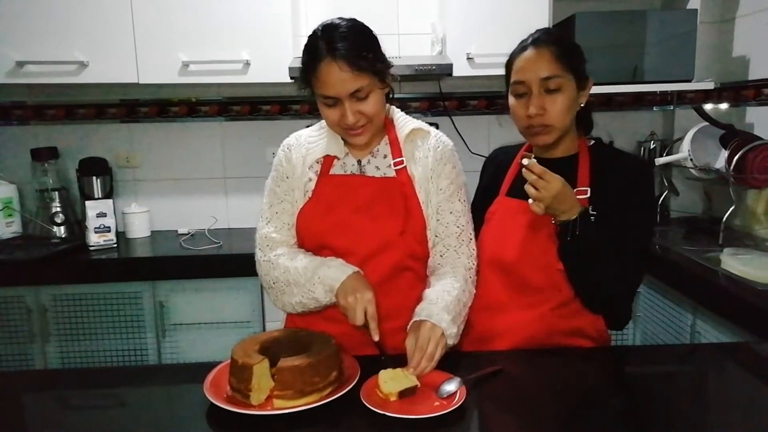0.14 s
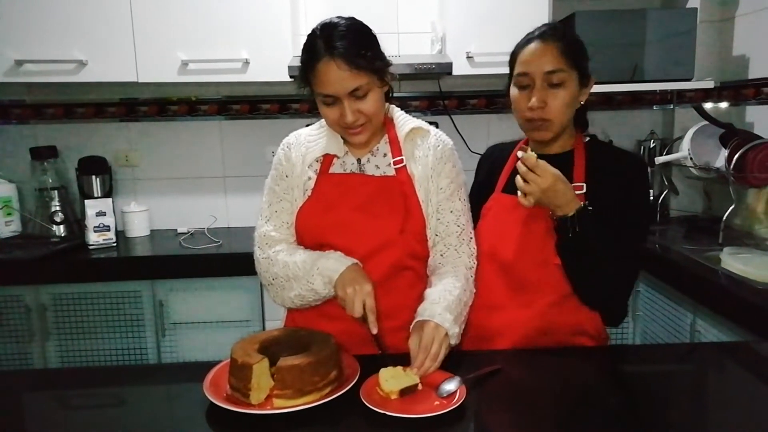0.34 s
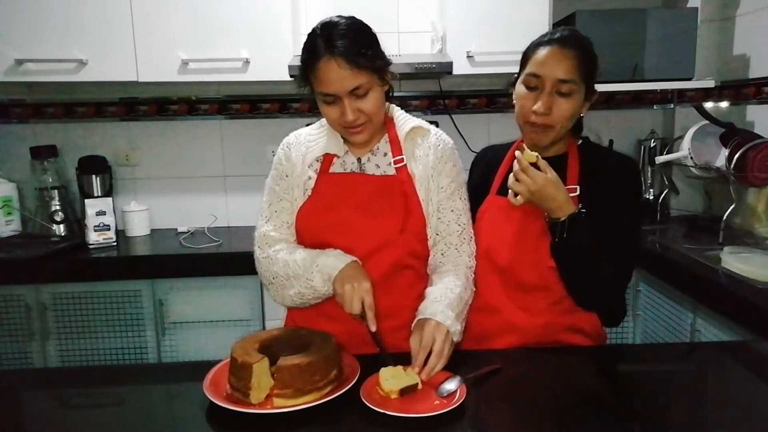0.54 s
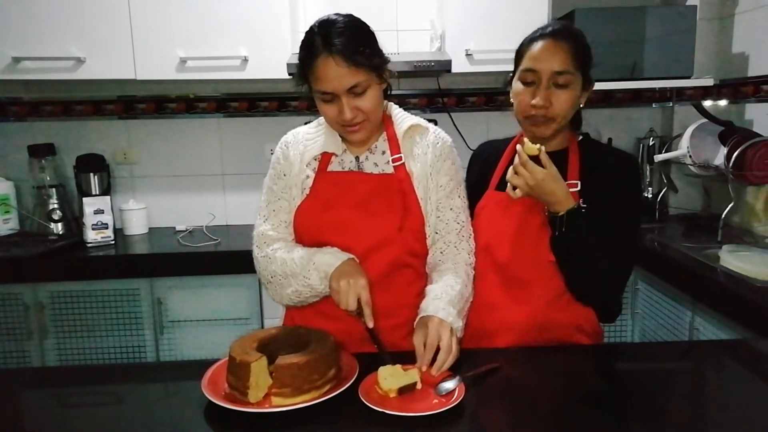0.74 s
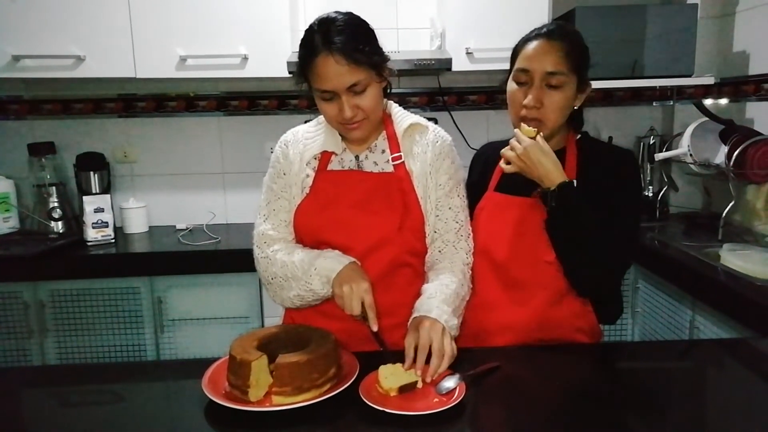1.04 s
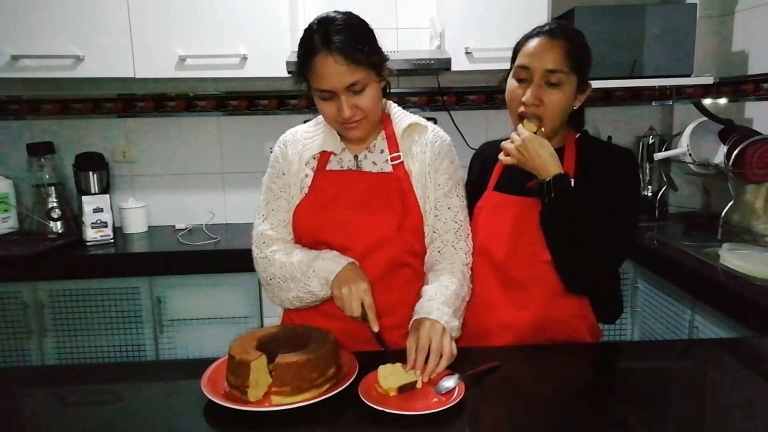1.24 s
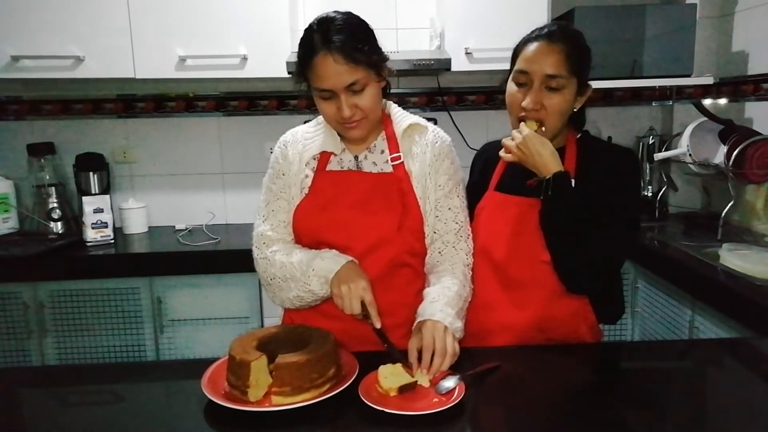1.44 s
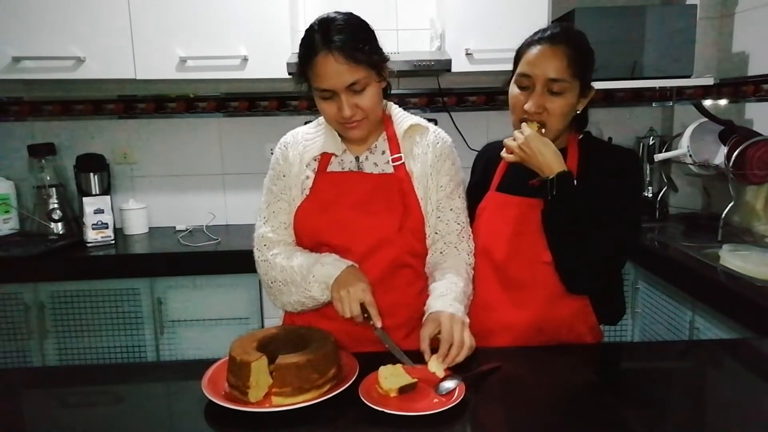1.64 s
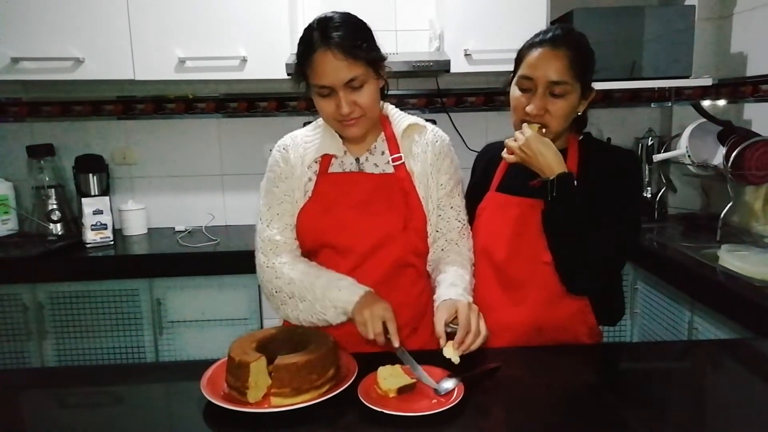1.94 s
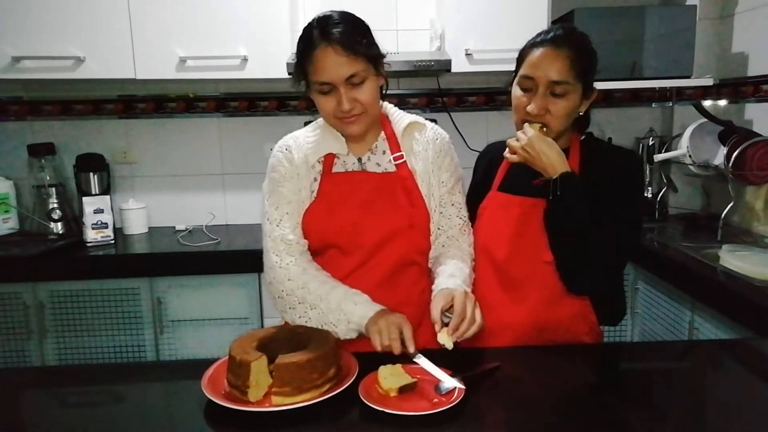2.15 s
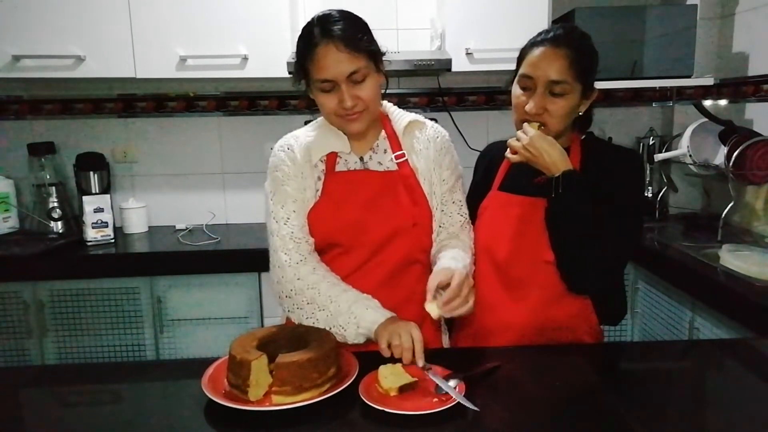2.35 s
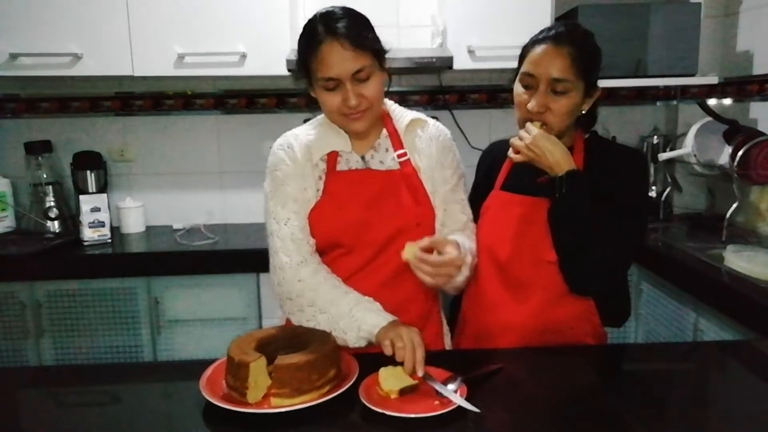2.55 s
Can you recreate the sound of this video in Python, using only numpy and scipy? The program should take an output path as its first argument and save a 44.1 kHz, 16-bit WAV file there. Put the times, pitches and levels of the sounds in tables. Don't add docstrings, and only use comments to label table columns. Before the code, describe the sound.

Knife clinks against a ceramic plate while cutting cake, one sharp hit, later a quick clattering set-down.

```python
import sys
import numpy as np
from scipy import signal
from scipy.io import wavfile
from scipy.ndimage import uniform_filter1d, minimum_filter1d

SR = 44100
rng = np.random.default_rng(int(sys.argv[2]) if len(sys.argv) > 2 else 0)


def voltage_ratio(level):
    return 10 ** (np.asarray(level, float) / 20)


def master_out(mix):
    frames = np.transpose(np.atleast_2d(mix))
    ceiling = np.clip(frames, -1, 1)
    pcm = np.round(ceiling * 32767).astype(np.int16)
    wavfile.write(sys.argv[1], SR, pcm)


N = 119070
LEAD = 8820
MIC_LAG = 26

# pitch_hz, t60_s, centre_level_db, rim_level_db, pan_db (left over right)
PLATE_MODES = [(690, .03, -38.5, -46.5, -11), (1427, 0.066, -19.5, -11, -1.5), (1892, 0.095, -14, -19, -4),
               (2054, 0.047, -16, -4.5, 2.5), (2270, 0.062, -16.5, -10.5, 1),
               (2640, 0.046, -16.5, -22, -8.5), (3053, 0.067, -4, -12, -6.5),
               (3460, 0.073, -13, -8.5, -9.5), (4152, 0.067, -6.5, -22, 0), (4268, .08, -3, -8.5, 3.5),
               (4460, 0.046, -17, -30, -3), (5410, .055, -12.5, -10.5, -11.5),
               (5800, 0.086, -1.5, -5.5, 2.5), (6712, .09, -8.5, -6, -7)]
# pitch_hz, t60_s, centre_level_db, rim_level_db, pan_db (left over right)
BLADE_MODES = [(923, 0.023, -21, -18.5, -14), (3580, .06, -11.5, -18, 0), (7430, 0.042, 1.5, -2, -8),
               (8137, 0.1, -8.5, -0.5, -9), (8700, 0.057, -9.5, -2.5, -7.5), (9000, 0.067, -18.5, -7, -3.5),
               (9267, 0.07, -10.5, -5, -17), (10280, 0.057, -18, -19.5, -10),
               (11140, .07, -10.5, -13, -0.5), (12080, .05, -17, -12.5, -6), (12640, 0.046, -21, -10, -9.5),
               (13170, .04, -19.5, -17.5, 0.5), (15500, .04, -21, -16.5, -3.5), (15080, .04, -21, -17, 2)]
# start_s, level_db, place (0 centre, 1 rim), contact_ms
KNIFE_CONTACTS = [(-.12, -20.5, 1.64, 0.21), (.026, -36, 0.12, 0.33), (0.2437, -44, 0.95, 0.15),
                  (.2445, -6, 0.17, 0.16), (.2485, -12.5, 0.078, 0.075), (.5157, -38, 0.37, 0.25),
                  (.5566, -38, 0.38, 0.31), (.59, -44.5, 0.31, 0.74), (.7642, -50.5, 0.14, 0.11),
                  (2.3272, -42, 0.55, .1), (2.3289, -20, 1.33, .1), (2.3341, -16, 0.95, 0.026),
                  (2.336, -15.5, 0.64, 0.044), (2.3418, -17.5, 0.77, 0.067), (2.3504, -21.5, 0.64, 0.17)]
# pitch_hz, level_db
CRACK_COLOUR = [(400, -46), (650, -16), (1200, -11.5), (2000, -6.5), (4000, -2), (9000, -11), (10000, -29),
                (13000, -17)]
# start_s, level_db, pitch_hz, t60_s
CRUMB_SNAPS = [(-.06, -19, 710, 0.017), (-.06, -24, 262, 0.013), (-.03, -21.5, 5530, .015),
               (-.03, -13.5, 8500, 0.0077), (-.05, -31, 2148, 0.014), (2.344, -19.5, 4255, 0.16),
               (-.04, -24, 3030, 0.025), (-.04, -32, 1450, 0.038), (.5157, -38, 2240, 0.013),
               (.545, -42.5, 2017, 0.096), (.5566, -37, 2270, 0.055), (0.5557, -44.5, 4380, 0.075),
               (1.0114, -27, 9140, 0.0047), (1.0151, -31.5, 8600, 0.0049), (1.018, -43, 9400, .004),
               (1.143, -46, 7000, .003), (1.1471, -30.5, 8800, 0.0045), (1.1518, -35, 8650, .006),
               (2.47, -30, 4296, 0.12)]
# start_s, level_db, pitch_hz, t60_s
RIM_RINGS = [(.245, -46.5, 1420, 0.68), (.245, -36, 1860, .6), (0.244, -32, 3081, .65),
             (.245, -39, 3145, .6), (.245, -44, 4320, .45), (.245, -40, 3040, 0.74), (.245, -42, 3466, .5),
             (.245, -34, 4230, 0.39), (.245, -38, 4100, 0.39), (.245, -31, 5780, .65),
             (.245, -37, 5850, .55), (.245, -39, 5720, 0.68), (.245, -31, 6730, .5), (.245, -36, 7450, .6),
             (2.333, -39, 1414, 0.57), (2.335, -34, 5890, 0.42), (2.335, -34, 5840, .5),
             (2.335, -32, 7380, .5), (2.335, -39, 2990, .5), (2.335, -38, 8140, 0.43),
             (2.335, -35.5, 3424, 0.48)]
# start_s, level_db, pitch_hz, length_s,
# pan_db (left over right)
SOFT_SWELLS = [(-.01, -39, 48, .11, 2), (.055, -29, 92, .041, 2.5), (.085, -36, 28, .073, 0),
               (.069, -44, 320, .015, 7), (.062, -47, 486, .025, 7), (.58, -45, 301, .03, 2),
               (.572, -45, 492, .025, 6.5), (.574, -45, 60, .052, 1), (.831, -42, 482, .018, 6.5),
               (.836, -56, 333, .033, 12), (.831, -54, 1024, .023, 12), (.828, -60, 1304, .014, 12),
               (.836, -40, 93, .039, 4), (1.822, -48, 60, .057, 3.5), (1.86, -41, 118, .057, 1),
               (2.14, -42, 122, .036, 3), (2.46, -32, 4296, .04, 0)]
# start_s, length_s, level_db, pitch_hz,
# width_hz
NOISE_SWELLS = [(.02, 0.025, -51, 5600, 530), (.022, .025, -52, 3370, 380), (.05, .06, -55, 5630, 500),
                (.152, 0.073, -56, 5440, 440), (.152, 0.072, -56.5, 8420, 600), (1.015, .08, -57.5, 9000, 1100),
                (1.15, .05, -70, 8800, 1000), (2.11, 0.15, -64, 335.3, 19), (2.33, .1, -58, 335, 90),
                (.46, 0.059, -54, 5800, 200), (.47, .05, -57, 3100, 250), (2.57, 0.038, -48, 4325, 140),
                (2.572, .035, -54, 3010, 1500), (1.5, 0.39, -63.5, 136.1, 19)]
# pitch_hz, t60_s
ROOM_DECAY = [(500, 0.83), (1400, 0.62), (2700, 0.55), (5000, 0.54), (8000, 0.46), (12000, 0.31),
              (16000, 0.289)]
# pitch_hz, level_db
DIRECT_SHADE = [(500, -7.5), (2500, -3.5), (5500, -1.5), (7000, -3.5), (8200, -27), (10000, -28.5),
                (15000, -38)]
# pitch_hz, level_db
ROOM_SHADE = [(500, 0.5), (1000, -4), (2500, -4.5), (5500, 1.5), (7000, -11.5), (8200, -23.5),
              (10000, -28.5), (15000, -34.5)]
# pitch_hz, level_db (per Hz)
HUM_COLOUR = [(12, -33), (20, -2.5), (60, -5), (101, -18.5), (140, -11.5), (229, -18.5), (308, -19),
              (511, -28.5), (1000, -24.5), (1300, -88), (2200, -120)]
# pitch_hz, level_db (per Hz)
HISS_COLOUR = [(500, -18), (1000, -3.5), (2090, -8), (6500, -11), (8500, -7.5), (10500, -14.5),
               (13000, -15.5), (15900, -31.5)]
# pitch_hz, likeness (0 to 1)
BACKGROUND_LIKENESS = [(60, 1), (130, 1), (290, 0.602), (640, 0.2), (1410, 0.26), (3100, 0.23),
                       (15000, 0.096)]
# pitch_hz, pan_db (left over right)
BACKGROUND_PAN = [(60, -0.5), (180, 1), (550, -1.5), (1650, -0.5), (4970, 0.5), (15000, -4.5)]


def evened(x):
    return x / np.sqrt(np.mean(x ** 2) + 1e-20)


def read(points, hz):
    f, value = np.transpose(points)
    return np.interp(np.log(hz + 1), np.log(f + 1), value)


def add(mix, start_s, sound):
    part = mix[..., LEAD + round(start_s * SR):][..., :sound.shape[-1]]
    part += sound[..., :part.shape[-1]]


def colour(x, points):
    log_gain = np.log(voltage_ratio(read(points, abs(np.fft.fftfreq(2048, 1 / SR)))))
    taps = np.fft.ifft(np.exp(np.conj(signal.hilbert(log_gain)))).real[:1024]
    return signal.oaconvolve(x, taps)[:len(x)]


def panned(x, pan_db):
    return x * voltage_ratio(np.array([[pan_db / 2], [-pan_db / 2]]))


def clink(level_db, place, contact_ms):
    damping, pair_split, detune, rise_s = 0.46, 0.0049, 0.0025, 0.0006
    crack_db, crack_rim_db, crack_t60_s = -1, -1.5, 0.013
    t = np.arange(8000) / SR
    out = np.zeros((2, len(t)))
    for hz, t60, centre_db, rim_db, pan_db in PLATE_MODES + BLADE_MODES:
        hz = hz * (1 + detune * rng.standard_normal())
        ring_db = centre_db + (rim_db - centre_db) * place - 60 * t / (t60 * damping)
        beating = np.cos(np.pi * hz * pair_split * t)
        ring = voltage_ratio(ring_db) * np.sin(2 * np.pi * hz * t) * beating
        out += panned(ring * rng.choice([-1., 1.]), pan_db)
    crack = evened(colour(rng.standard_normal(len(t)), CRACK_COLOUR))
    out += voltage_ratio(crack_db + crack_rim_db * place - 60 * t / crack_t60_s) * crack
    keep = np.exp(-1000 / (SR * max(contact_ms, .005)) * 2 * np.pi)
    return voltage_ratio(level_db) * signal.lfilter([1 - keep], [1, -keep], out) * np.minimum(t / rise_s, 1)


def crumb(level_db, hz, t60):
    t = np.arange(20000) / SR
    rise = np.minimum(t / (0.043 * t60), 1)
    return voltage_ratio(level_db - 60 * t / t60) * np.sin(2 * np.pi * hz * t) * rise * np.ones((2, 1))


def kitchen(x, stretch):
    taps = np.zeros((2, SR))
    at = np.arange(60, SR - 10, 10) + rng.integers(0, 10, (2, (SR - 61) // 10))
    np.put_along_axis(taps, at, rng.choice([-1., 1.], at.shape), 1)
    hz, t, z = signal.stft(taps, SR, nperseg=256)
    decay = voltage_ratio(-60 * t / (stretch * read(ROOM_DECAY, hz)[:, None]))
    tail = signal.istft(z * decay, SR, nperseg=256)[1][:, :SR]
    tail = tail * np.minimum(np.arange(SR) / SR / 0.0032, 1)
    wet = signal.fftconvolve(x[None], tail / np.linalg.norm(tail[0]), axes=1)[:, :len(x)]
    return np.array([colour(wet[0], ROOM_SHADE), wet[1]])


def soft_swell(level_db, hz, length, pan_db):
    t = np.arange(0, length, 1 / SR)
    swell = np.sin(np.pi * (t / length) ** 0.78) ** 2
    return panned(voltage_ratio(level_db) * swell * np.sin(2 * np.pi * hz * t), pan_db)


def airy(points, size, patchy_db, low_hz):
    frames, hz = 4 * N // size + 5, np.fft.rfftfreq(size, 1 / SR)
    a, b, c, d, patches = rng.standard_normal((frames, size // 2 + 1, 5)).T
    patches = uniform_filter1d(patches, size=6, axis=0)
    patches = evened(uniform_filter1d(patches, size=6, axis=1))
    same = np.clip(read(BACKGROUND_LIKENESS, hz), -1, 1)[:, None]
    left = a + 1j * b
    lag = np.exp(2j * np.pi * hz * MIC_LAG / SR)[:, None]
    right = same * left * lag + np.sqrt(1 - same ** 2) * (c + 1j * d)
    z = np.array([left * voltage_ratio(read(BACKGROUND_PAN, hz))[:, None], right])
    z = z * voltage_ratio(read(points, hz)[:, None] + patchy_db * patches) * (hz[:, None] >= low_hz)
    return evened(signal.istft(z, nperseg=size, noverlap=3 * size // 4)[1][:, :N])


def motor():
    pitch_hz, width_hz, level_db = 137.5, 8.4, -73
    keep = np.exp(-np.pi * width_hz / SR)
    slow = signal.lfilter([1], [1, -keep], rng.standard_normal(N) + 1j * rng.standard_normal(N))
    return voltage_ratio(level_db) * evened((slow * np.exp(2j * np.pi * pitch_hz * np.arange(N) / SR)).real)


def noise_swell(length, level_db, hz, width_hz):
    t = np.arange(0, length, 1 / SR)
    keep = np.exp(-np.pi * width_hz / SR)
    slow = np.array([1, 1j]) @ rng.standard_normal((2, len(t)))
    for _ in range(2):
        slow = signal.lfilter([1], [1, -keep], slow)
    band = evened((slow * np.exp(2j * np.pi * hz * t)).real)
    return voltage_ratio(level_db) * np.sin(np.pi * np.sqrt(t / length)) * band * np.ones((2, 1))


def background():
    hum = voltage_ratio(-59.5) * airy(HUM_COLOUR + [(1100, -89.5)], size=4096, patchy_db=2.5, low_hz=15)
    hiss = voltage_ratio(-64.5) * airy(HISS_COLOUR + [(16100, -90)], size=1024, patchy_db=.9, low_hz=1000)
    return hum + hiss + motor()


def scene():
    knife, snaps, low = np.zeros((3, 2, N + LEAD))
    for start_s, *row in KNIFE_CONTACTS:
        add(knife, start_s, clink(*row))
    for start_s, *row in CRUMB_SNAPS + RIM_RINGS:
        add(snaps, start_s, crumb(*row))
    for start_s, *row in SOFT_SWELLS:
        add(low, start_s, soft_swell(*row))
    near = knife + snaps
    for start_s, *row in NOISE_SWELLS:
        add(near, start_s, noise_swell(*row))
    near = np.array([colour(near[0], DIRECT_SHADE), near[1]])
    cut = knife.mean(0) * (np.arange(N + LEAD) < LEAD + 1.5 * SR)
    laid_down = knife.mean(0) - cut
    wet = kitchen(voltage_ratio(2.5) * laid_down + voltage_ratio(-7) * snaps[0], 0.97)
    wet = wet + kitchen(voltage_ratio(-.5) * cut, 0.9) + kitchen(voltage_ratio(-8.5) * cut, 1.504)
    low = np.array([low[0], np.roll(low[1], MIC_LAG)])
    return (near + wet + low)[:, LEAD:] + background() * voltage_ratio(6)


def top_cut(x):
    return signal.sosfilt(signal.butter(12, 15800, fs=SR, output="sos"), x)


def record(dry):
    depth_db, knee_db, open_at_db, range_db = 6, 1.2, -51, 30
    memory, ceiling = 13000, .85
    treble = signal.sosfilt(signal.butter(2, 1500, "high", fs=SR, output="sos"), dry)
    power = uniform_filter1d((treble ** 2).mean(0), round(.03 * SR))
    power_db = 10 * np.log10(abs(power) + 1e-12)
    recent_db = -minimum_filter1d(-power_db, size=memory, origin=memory // 2 - 1)
    threshold_db = np.maximum(open_at_db, recent_db - range_db)
    shut = 1 / (1 + np.exp((power_db - threshold_db) / knee_db))
    gated = dry * voltage_ratio(-depth_db) + treble * (voltage_ratio(-depth_db * shut) - voltage_ratio(-depth_db))
    clipped = ceiling * np.tanh(gated / ceiling)
    low_pass = signal.firwin(511, 15600, window=("kaiser", 9), fs=SR)
    return top_cut(signal.oaconvolve(clipped, low_pass[None], "same"))


dry = scene()
out = record(dry)
master_out(out)
```